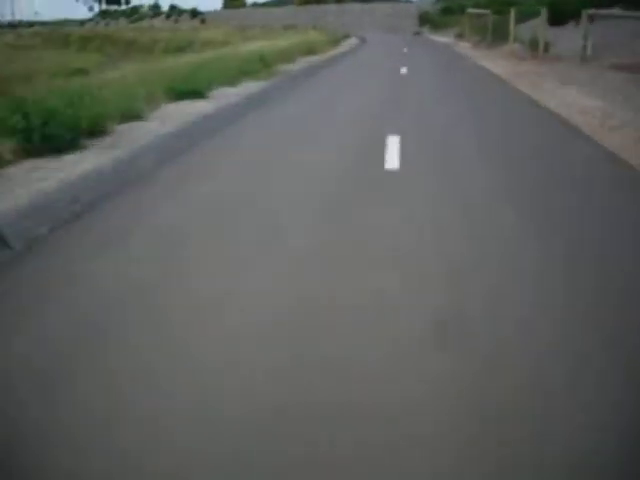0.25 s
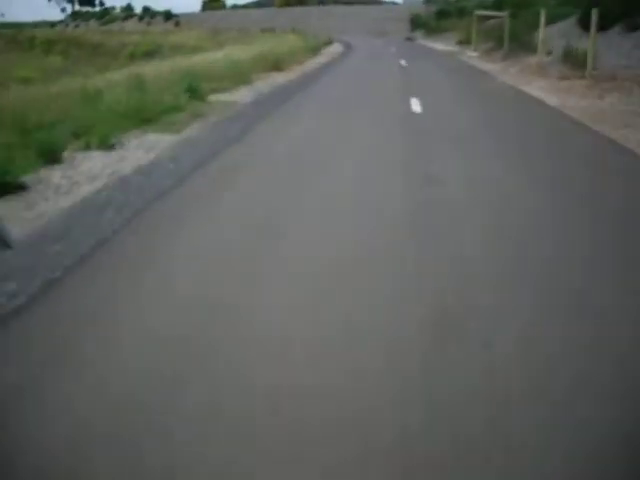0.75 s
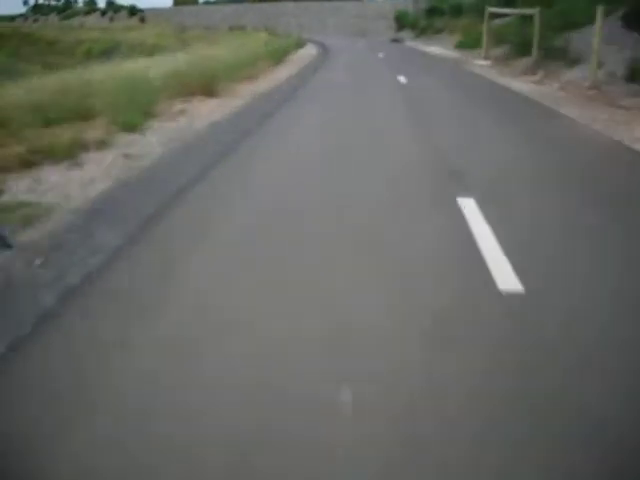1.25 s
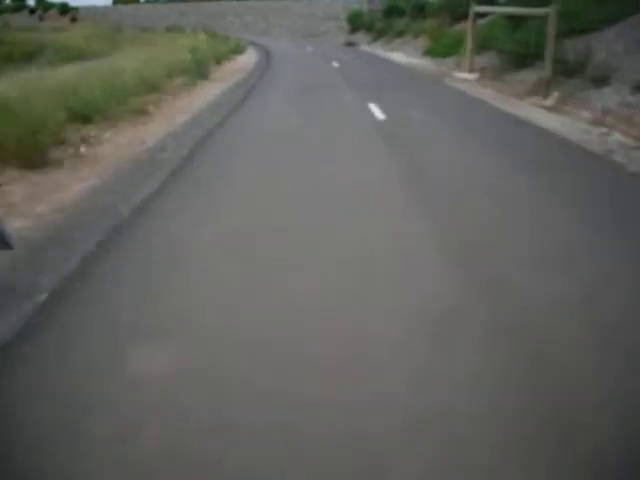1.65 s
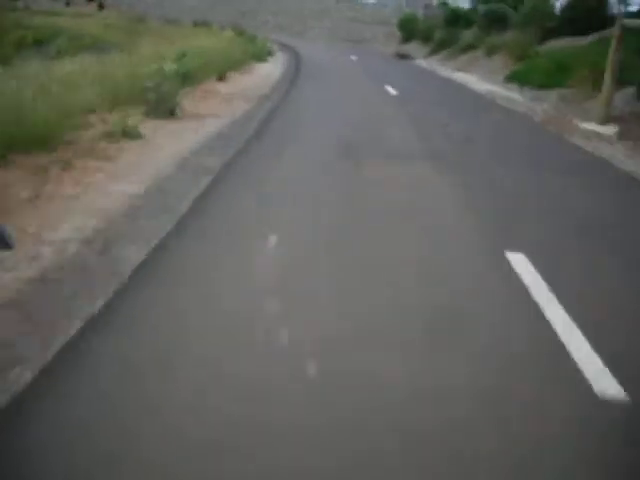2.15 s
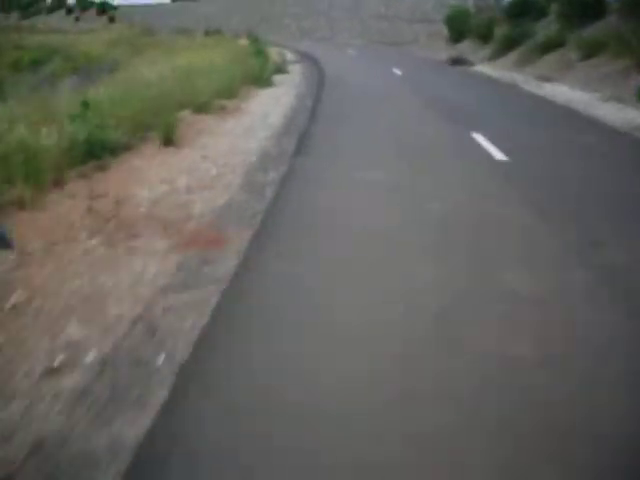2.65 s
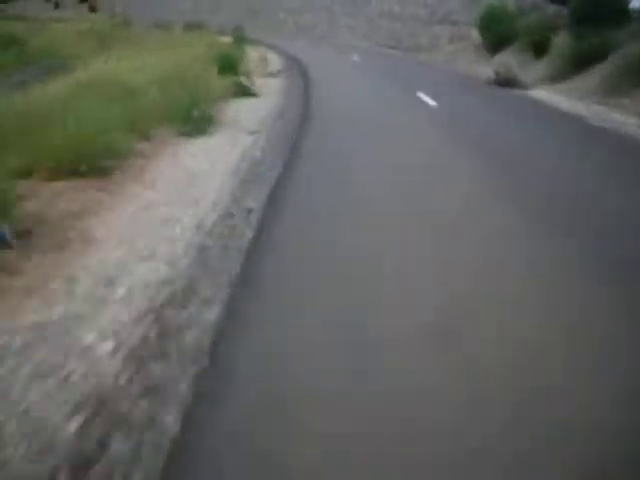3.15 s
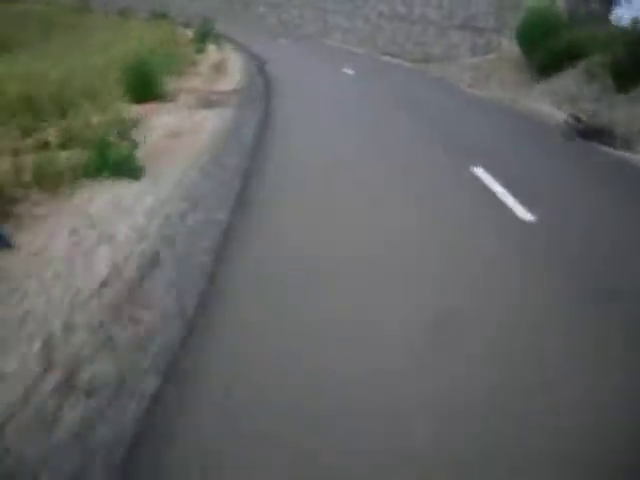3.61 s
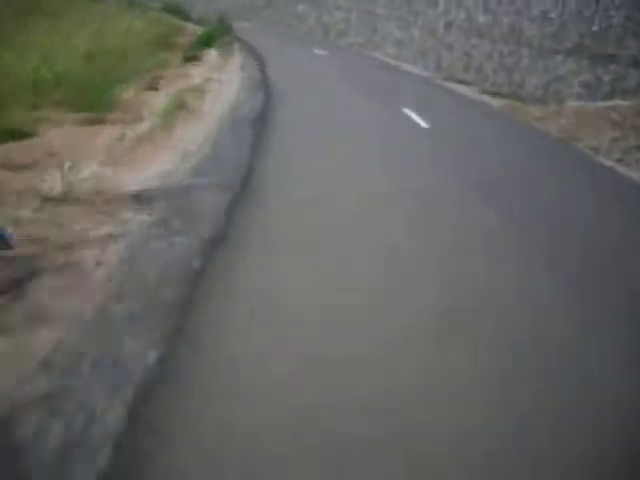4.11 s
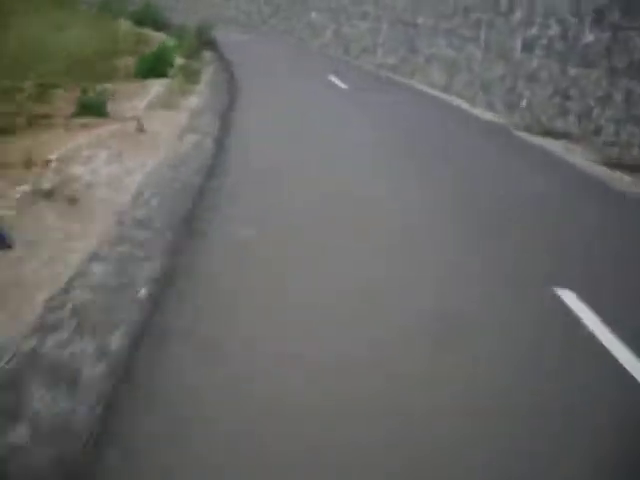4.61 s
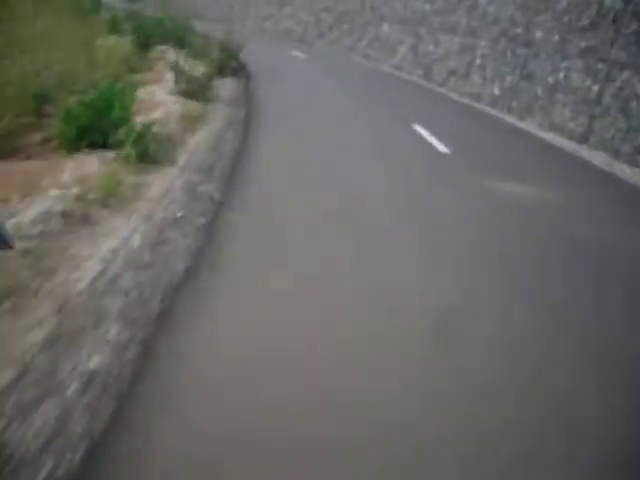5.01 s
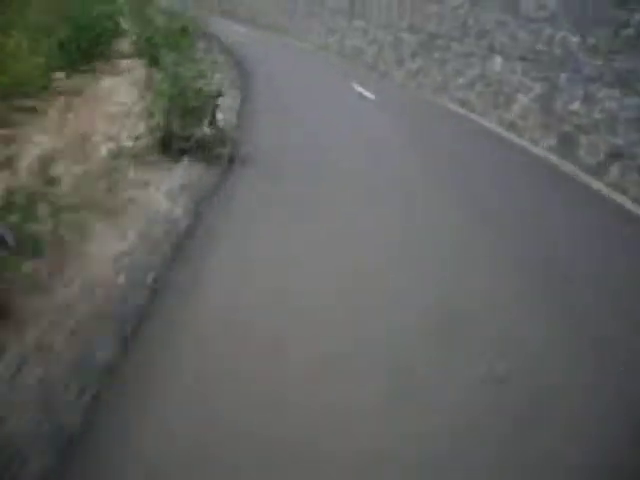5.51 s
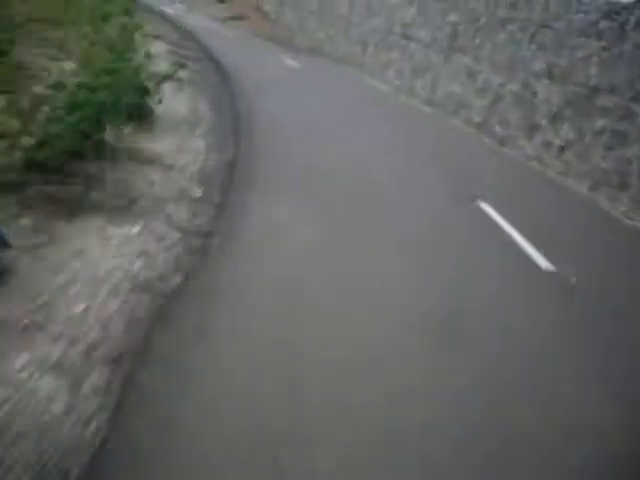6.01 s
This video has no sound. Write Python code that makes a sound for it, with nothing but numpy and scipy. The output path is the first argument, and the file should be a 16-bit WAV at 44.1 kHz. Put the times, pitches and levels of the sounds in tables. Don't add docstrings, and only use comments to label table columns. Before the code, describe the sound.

A bicycle rolls fast on smooth asphalt, tyre roar humming through the frame while a loose camera mount knocks and rattles amid low wind buffeting.

```python
import sys
import numpy as np
from scipy import signal
from scipy.fft import rfft, irfft, next_fast_len
from scipy.io import wavfile
from scipy.ndimage import uniform_filter1d, map_coordinates

SR = 44100
rng = np.random.default_rng(int(sys.argv[2]) if len(sys.argv) > 2 else 0)


def rack_gain(trim_db):
    fader = np.asarray(trim_db, float)
    return 10 ** (fader / 20)


def bounce(signal):
    frames = np.transpose(np.atleast_2d(signal))
    limited = np.clip(frames, -1, 1)
    pcm = np.round(limited * 32767).astype(np.int16)
    wavfile.write(sys.argv[1], SR, pcm)


N = 276066

# time in seconds, tread hiss in dB.
ROAD = [(0.0, -30), (0.24, -28), (0.61, -26), (0.77, -28.5), (1.2, -27), (1.38, -29.5), (2.42, -27.5),
        (2.6, -29), (2.7, -27), (3.42, -28), (4.15, -27), (4.31, -29.5), (4.55, -29.5), (5.42, -28),
        (5.54, -29), (5.94, -26), (6.26, -31)]
# time in seconds, kick in dB, swell of the frame's hum in dB.
BUMPS = [(0.048, -2, 6), (.297, -3, 2), (.388, 4.5, 2), (0.495, -8, 5.5), (.536, 0, 1), (.74, 6.5, 5),
         (.955, -11.5, 4.5), (1.439, -4, 1.5), (1.73, -0.5, 11), (1.843, -11, 8), (2.146, -5, 4.5),
         (2.523, 2.5, 5.5), (2.595, -12, 6), (2.909, -5, 2), (2.985, -1, 1), (3.462, -5, 4), (3.486, -2, 6),
         (3.949, -14, 4.5), (4.271, -4, 5), (4.65, -5, 1), (4.723, -5.5, 1), (5.049, -12, 1),
         (5.123, -11, 4), (5.19, 0.5, 4.5), (5.32, -5, 3.5), (5.602, 1.5, 1.5), (5.783, -21, 2.5),
         (6.003, -8, 5), (6.134, -2, 6), (6.236, -3, 7.5)]


def road_levels():
    rise_s, fall_s = 0.022, 0.035
    hiss_db, = curves(ROAD)
    road_db = 0.4 * (hiss_db - hiss_db.mean())
    hum_db = -13.5 + road_db + swells(BUMPS, rise_s, fall_s)
    return hiss_db, hum_db


def tyre_load():
    load, t = np.ones(N), np.arange(N) / SR
    for s, _, _ in BUMPS:
        near = slice(max(round((s - .02) * SR), 0), round((s + .02) * SR))
        load[near] *= 1 - 0.9 * np.exp(-((t[near] - s + .003) / 0.0041) ** 2)
    return load


def bump_jolts():
    return filtered(impulses(BUMPS), lambda f: modes([(520, 520, 1.5)])(f) ** 3)


# frequency in Hz, width in Hz, level in dB.
FRAME = [(362.5, 47.4, 3.5), (457.4, 79.4, 3), (598, 78.5, -5), (723, 95.5, -12.5), (913, 123.4, -21.5)]


def frame_hum(grain, hum_db):
    def tubes(f):
        lift = (f / 330) ** 4
        return modes(FRAME)(f) * lift / (1 + lift)

    ring = unit(filtered(rng.standard_normal(N), tubes))
    return rack_gain(hum_db + 1.12) * steadied(rack_gain(2.4 * grain) * ring, .06, .8)


# frequency in Hz, density in dB per Hz.
TREAD = [(500, -30), (800, -5), (1000, -6), (1200, -3.5), (1500, -13.5), (1900, -19), (2250, -17.5),
         (2450, -23), (2670, -15), (2900, -23.5), (3300, -32.5), (3900, -47.5), (4900, -40), (6000, -120)]


def tread_hiss(grain, hiss_db, hum_db):
    grit = rack_gain(1.9 * grain + 1.3 * wobble(250))
    hiss = steadied(grit * coloured(TREAD), 0.13, .6)
    with_hum_db = 0.21 * (hum_db - hum_db.mean())
    return rack_gain(hiss_db - 0.67 + with_hum_db) * hiss


def rolling(grain):
    hiss_db, hum_db = road_levels()
    load = tyre_load()
    hum = load * frame_hum(grain, hum_db)
    hiss = (.6 + .4 * load) * tread_hiss(grain, hiss_db, hum_db)
    return hum + hiss + bump_jolts()


# time in seconds, tick in dB, then the dull knock and
# the bright edge, both in dB above the tick.
KNOCKS = [(.3892, -7.5, -4, -10.5), (.3949, -19.5, 16, -17), (.4977, -16.5, 2, -20),
          (.7398, -21.5, 11, -10), (.7462, -21, 9.5, -19), (.7591, -15.5, 3, -12),
          (1.7339, -20.5, -12, -19), (1.7382, -6.5, -7, -15), (1.745, -10, 5.5, -10),
          (1.761, -8.5, -1, -18), (1.765, -23, 8, -14), (1.8462, -18.5, 6.5, -10), (2.5253, -8, 0, -12),
          (2.5317, -14, -10, -22), (2.5457, -16, -10.5, -19), (2.8989, -28, 12, -28), (3.493, -20, 12, -8),
          (4.7239, -22.5, 7.5, -15), (5.19, -12.5, 4, -16), (5.1949, -13.5, 4.5, -5),
          (5.2072, -17, -2, -10), (5.2118, -15.5, 13, -16), (5.2244, -18, 0.5, -25),
          (5.3717, -17.5, 9.5, -26), (5.5981, -22.5, 8, -33), (5.6156, -19, 2, -33), (5.6215, -21, 1, -23),
          (5.7863, -13, 6, -32), (6.0042, -14, 5, -10), (6.1361, -17, 4, -23)]


def hard_blows():
    return list(KNOCKS)


# start in seconds, length in seconds, tick in dB,
# dull knock in dB above the tick.
RATTLES = [(0.041, .03, -24, 10), (0.3, .001, -28, 10.5), (.3837, 0.016, -26, 7.5), (.4415, 0.01, -31, 9),
           (0.497, .009, -21.5, 0), (.743, 0.037, -26.5, 5.5), (0.984, .013, -27, 4),
           (1.4343, .013, -24.5, 3), (2.8724, 0.0011, -34.5, 12.5), (1.722, 0.057, -26, 8),
           (1.842, 0.014, -32, 13.5), (2.2247, 0.0067, -25, 4), (2.531, 0.026, -27, 5.5),
           (2.61, 0.009, -30, 12.5), (2.889, .033, -27, 5.5), (2.9874, 0.00085, -24, 9.5),
           (3.4349, .003, -25, -5), (3.4899, 0.0082, -25.5, 6.5), (3.699, .01, -27.5, 10.5),
           (4.2696, 0.0091, -22.5, 6), (4.814, .006, -28, 5.5), (5.1994, 0.041, -26, 5),
           (5.3115, 0.015, -29.5, 9.5), (5.527, .001, -31, 8), (5.606, 0.016, -27.5, 8),
           (5.797, .004, -21.5, 2), (6.024, 0.007, -25.5, 8), (6.1035, 0.00074, -23, 13),
           (6.1436, 0.0046, -27.5, 13), (6.2287, 0.014, -23, 4.5)]


def rattle_contacts(count=12):
    gap_s, gap_scatter, size_scatter_db, colour_scatter_db = .005, .25, 1.9, 3.5
    rows = []
    for (s, length, db, dull_db), spread in zip(RATTLES, rng.standard_normal((len(RATTLES), 4, count))):
        drift, size, dull, edge = spread
        drift[0] = 0
        late = gap_s * (np.arange(count) + gap_scatter * np.cumsum(drift))
        spent_db = -12 * np.clip((late - length) / gap_s, 0, 9)
        rows += zip(s + np.abs(late), db + spent_db + size_scatter_db * size,
                    dull_db + colour_scatter_db * dull, -24 + colour_scatter_db * edge)
    return rows


def stray_ticks(count=44):
    when = rng.random(count) * N / SR
    dull, edge = 3.5 * rng.standard_normal((2, count))
    return list(zip(when, [-34] * count, 6 + dull, -10.5 + edge))


# frequency in Hz, width in Hz, level in dB.
CASE = [(1100, 1300, 0), (2750, 1200, 0), (4900, 1400, 0)]
PORT = [(167.0, 110, 4.2)]


def mount():
    force, t = np.zeros((4, N + SR)), np.arange(SR // 20) / SR
    decay_s = np.array([[.02], [.013], [.009], [.02]])
    fade = rack_gain(-11.5 - 60 * t / decay_s)
    rows = hard_blows() + rattle_contacts() + stray_ticks()
    for s, db, dull_db, edge_db in rows:
        chatter = rng.standard_normal((4, len(t)))
        hard_db = 0.14 * (db + 19.5)
        body_db = np.array([[dull_db + 26.5], [24], [0.95 * edge_db + 29.0], [dull_db + 30]])
        blow = 1.1 * np.sign(chatter[0, 0]) * (t == 0)
        force[:, round(s * SR):][:, :len(t)] += rack_gain(db + hard_db + body_db) * (blow + fade * chatter)
    bodies = [[mode] for mode in CASE] + [PORT]
    orders = 3, 4, 3, 2
    return sum(resonated(push[:N], body, order) for push, body, order in zip(force, bodies, orders))


# frequency in Hz, density in dB per Hz.
BUFFET = [(10, -43.5), (25, -10.5), (40, -6.5), (53, 0), (75, -10.5), (110, -12.5), (155, -2.5), (200, -5),
          (270, -6), (315, -13), (400, -39.5), (700, -120)]
# time in seconds, slap in dB, swell of the buffeting in dB.
THUMPS = [(0.037, -13, 10.5), (.283, -12, 9.5), (.391, -9, 2.5), (0.483, -4, 6), (.63, -20.5, 3.5),
          (.72, -0.5, 9), (0.999, -23, 6), (1.536, 3.5, 3), (1.715, -7, 6), (1.833, -7, 8.5),
          (2.507, -22, 8.5), (2.891, -20, 5.5), (3.225, -15, 3), (3.471, -6.5, 8.5), (3.54, -17, 4),
          (3.69, -6, 5.5), (4.04, -15, 0), (4.235, -16, 4), (4.707, -16, 1.5), (4.8, -18, 0.5),
          (4.888, -1, 4.5), (5.183, -5, 4.5), (5.303, -4, 4), (5.463, -1, -1), (5.523, -18, 5.5),
          (5.688, -10.5, 6.5), (5.77, 1, 8), (5.999, -16, 7.5), (6.121, -11.5, 8.5), (6.24, -26, 8)]


def wind(grain):
    rise_s, fall_s = 0.035, 0.054
    lumps = rack_gain(2.3 * wobble(12) + 0.3 * grain)
    buffet = steadied(lumps * coloured(BUFFET), 0.078, 1.0)
    buffet_db = -22.5 + swells(THUMPS, rise_s, fall_s)
    slaps = resonated(impulses(THUMPS), PORT, 2)
    return rack_gain(buffet_db + 1.78) * buffet + slaps


def unit(x):
    return x / np.sqrt(np.mean(x ** 2) + 1e-20)


def wobble(rate):
    knots = rng.standard_normal(int(N * rate / SR) + 4)
    return map_coordinates(knots, [np.arange(N) * rate / SR])


def filtered(x, response):
    m = next_fast_len(N + SR // 2)
    return irfft(rfft(x, m) * response(np.fft.rfftfreq(m, 1 / SR)), m)[..., :N]


def modes(table):
    def response(f):
        total = 0
        for k, (centre, width, db) in enumerate(table):
            damping = 1j * f * width
            total = total + (-1) ** k * rack_gain(db) * damping / (centre * centre - f * f + damping)
        return total
    return response


def resonated(x, body, order):
    return filtered(x, lambda f: modes(body)(f) ** order)


def coloured(points):
    f, db = np.transpose(points)
    colour = lambda hz: rack_gain(np.interp(np.log(hz + 1), np.log(f + 1), db))
    return unit(filtered(rng.standard_normal(N), colour))


def impulses(rows):
    push = np.zeros(N)
    for s, db, _ in rows:
        push[round(s * SR)] += rng.choice([-1, 1]) * rack_gain(db + 33)
    return push


def curves(rows):
    s, *cols = np.transpose(rows)
    return [np.interp(np.arange(N) / SR, s, c) for c in cols]


def steadied(x, span_s, share):
    power = np.abs(uniform_filter1d(x ** 2, max(round(span_s * SR), 2))) + 1e-9
    return unit(x / power ** (share / 2))


def swells(rows, rise_s, fall_s):
    t = np.arange(0, N + 64, 64) / SR
    late = t - np.array(rows)[:, :1]
    bells = np.array(rows)[:, -1:] * np.exp(-(late / np.where(late < 0, rise_s, fall_s)) ** 2)
    return np.interp(np.arange(N) / SR, t, bells.sum(0))


def scene():
    grain = wobble(40)
    return (rolling(grain) + mount() + wind(grain))[None]


def companded(x):
    size = np.abs(x) * 8192 + 33
    step = 2 ** (np.floor(np.log2(size)) - 4)
    return np.sign(x) * ((np.floor(size / step) + .5) * step - 33) / 8192


def band_limit(x):
    return signal.sosfilt(signal.butter(12, 15710, fs=SR, output="sos"), x)


def record(dry):
    hot = dry / (1 + np.abs(dry / 0.65) ** 5.5) ** (1 / 5.9)

    def band(hz):
        capacitor = 1j * hz / (40 + 1j * hz)
        dip = 1 - 0.49 * modes([(4050, 800, 0)])(hz)
        return capacitor * dip / np.sqrt(1 + (hz / 5250) ** 30)

    capped = np.clip(filtered(hot, band), -.705, .705)
    mix = filtered(companded(capped), lambda hz: hz < 15780)
    return band_limit(mix)


dry = scene()
out = record(dry)
bounce(out)
```